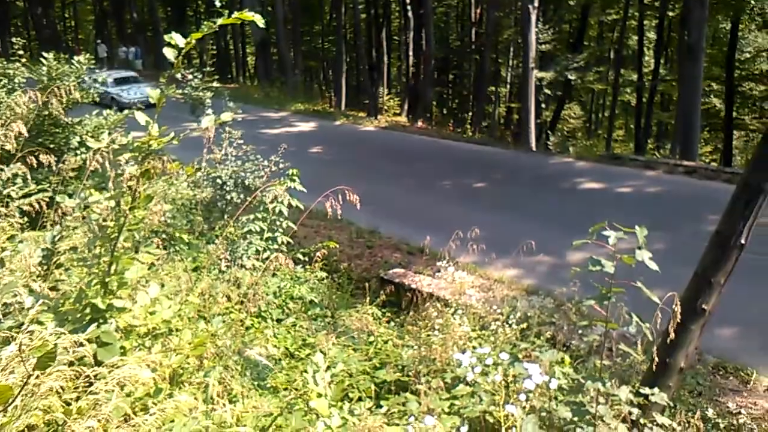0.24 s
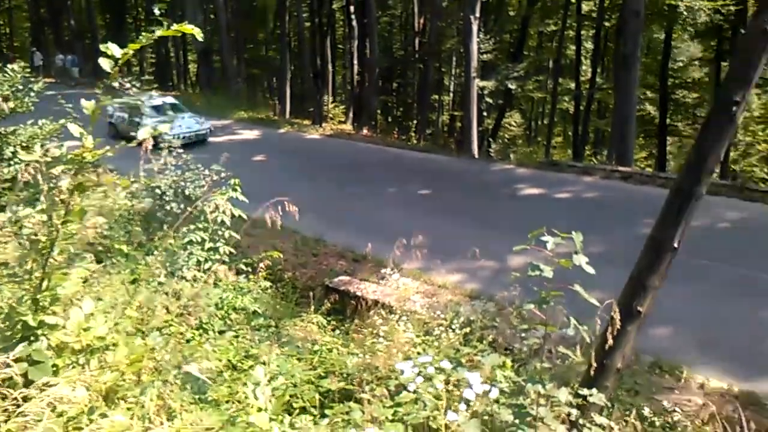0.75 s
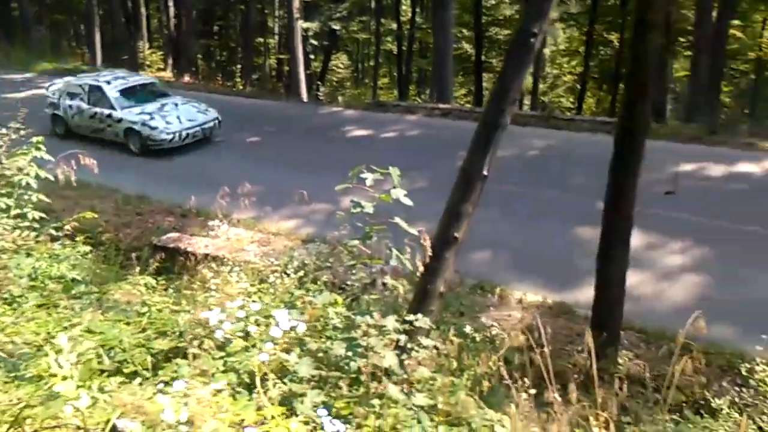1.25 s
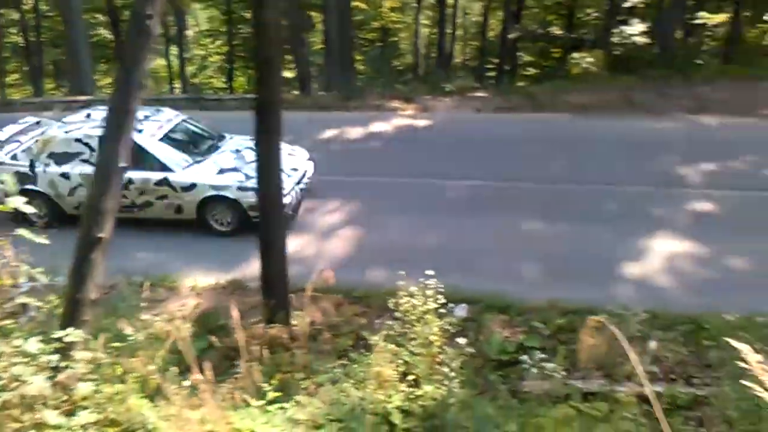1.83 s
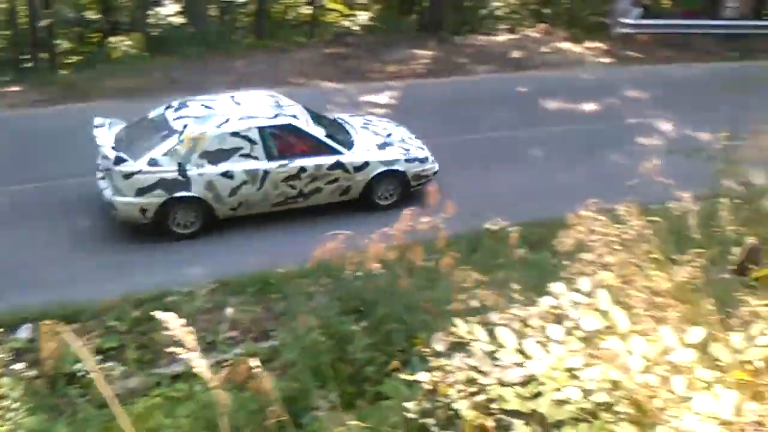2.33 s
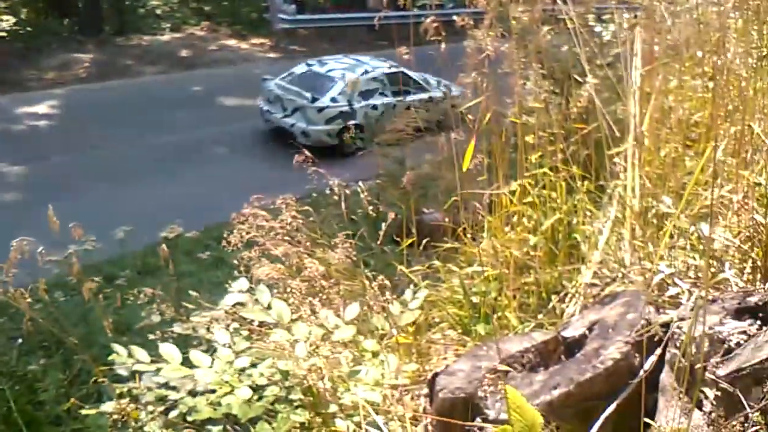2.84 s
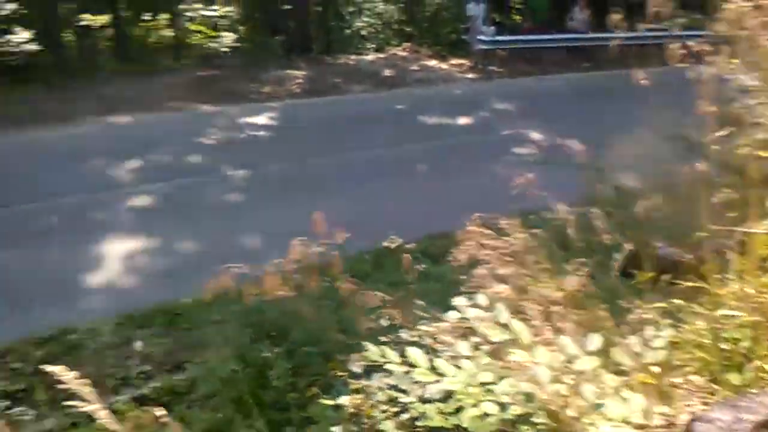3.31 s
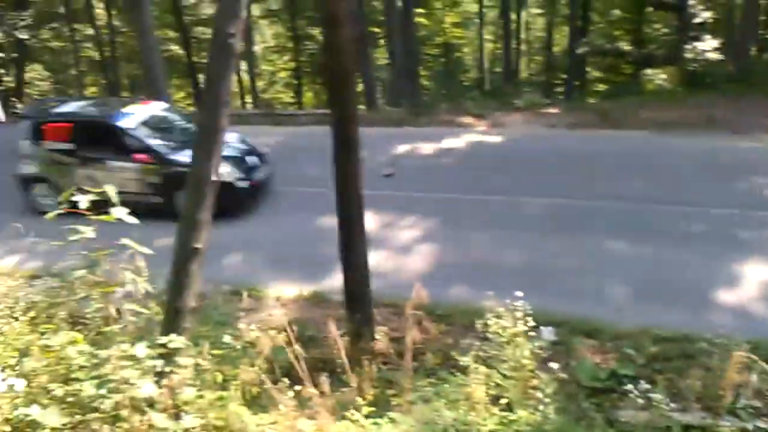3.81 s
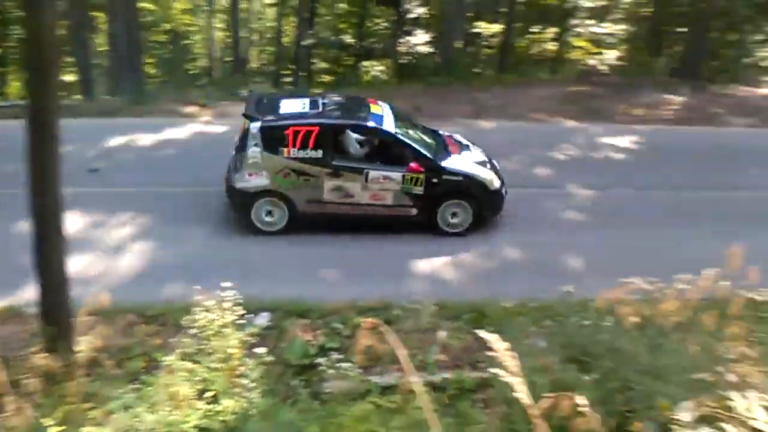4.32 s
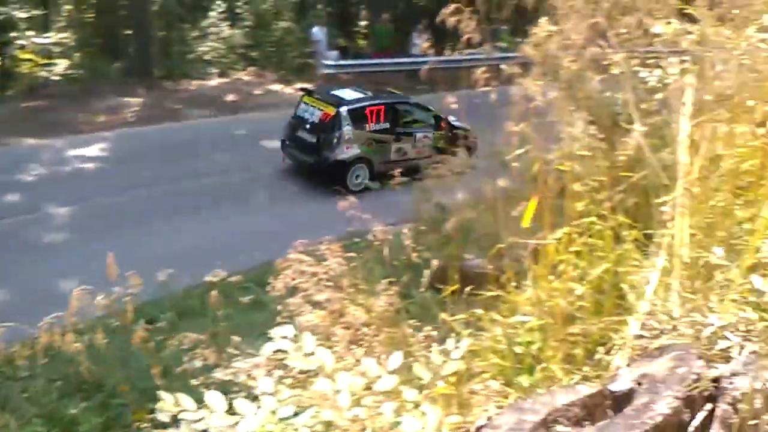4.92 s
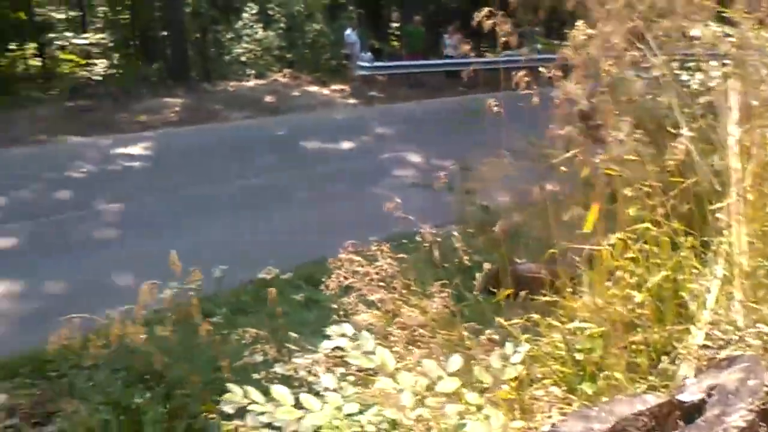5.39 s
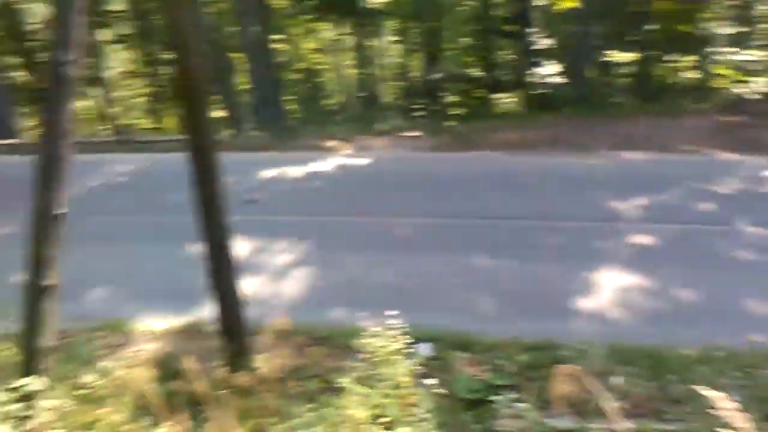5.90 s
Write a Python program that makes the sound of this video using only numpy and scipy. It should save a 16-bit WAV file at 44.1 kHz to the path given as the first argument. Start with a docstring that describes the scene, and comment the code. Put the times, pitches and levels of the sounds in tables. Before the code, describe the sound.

On a wooded bend, a first rally car approaches with a low engine drone that sinks in pitch, gives a brief thin brake squeak, passes in a wash of tyre noise and accelerates away. A second, louder car soon bursts in on steady revs, growls and barks as it passes, then recedes with hissing, scrubbing tyres. Heard outdoors from a roadside bank with a handheld microphone and faint echoes off trees.

```python
"""A spectator on a bank above a forest bend hears two rally cars go by, over an engine far up the road.
The first drones in on sinking revs, squeaks its brakes and pulls away; the second arrives louder,
holds its revs, barks as it passes and scrubs its tyres on the way out. Sine orders make the notes, uneven
firings ring the exhausts, and shaped noise makes tyres, grit and rushes. Ground and trunks add echoes."""
import sys
import numpy as np
from scipy import signal
from scipy.fft import rfft, irfft
from scipy.io import wavfile
from scipy.ndimage import uniform_filter1d, map_coordinates

SR = 44100
rng = np.random.default_rng(int(sys.argv[2]) if len(sys.argv) > 2 else 0)


def to_wav(s):
    """Save 16-bit WAV."""
    ch = np.atleast_2d(s).T  # columns
    pcm = np.round(np.clip(ch, -1, 1) * 32767)  # PCM
    wavfile.write(sys.argv[1], SR, pcm.astype(np.int16))


N = 271215
T = np.arange(N) / SR
HZ = np.fft.rfftfreq(N, 1 / SR)


def amp(db):
    """Decibels to gain."""
    return 10 ** (np.asarray(db) / 20)


def unit(x):
    """Scales to an rms of one."""
    return x / np.sqrt(np.mean(x ** 2) + 1e-20)


def curves(rows):
    """The columns of a table after its times, joined by straight lines."""
    s, *columns = np.transpose(rows)
    return [np.interp(T, s, c) for c in columns]


def during(rows, fade_s=0.049):
    """One while a table lasts, fading to nothing outside it."""
    return np.clip(1 + np.minimum(T - rows[0][0], rows[-1][0] - T) / fade_s, 0, 1)


def rise(s, seconds):
    """A smooth step from nothing to one, centred on s."""
    return .5 + .5 * np.tanh((T - s) / (2 * seconds))


def surges(rows, edge_s=0.032):
    """Decibels added by swells that rise, hold and fall."""
    return sum(db * rise(start, edge_s) * (1 - rise(end, edge_s)) for start, end, db in rows)


def noise():
    """White noise."""
    return rng.standard_normal(N)


def drift(hz):
    """Random wandering, up to about hz times a second, with an rms of one."""
    return unit(irfft(rfft(noise()) * np.exp(-(HZ / hz) ** 2), N))


def colour(x, points):
    """Gives x a spectrum drawn through (Hz, dB) points and rolled off beyond both ends."""
    f, db = np.transpose(points)
    gain = amp(np.interp(np.log(HZ + 1), np.log(f), db))
    top = 1 / (1 + (HZ / (2 * f[-1])) ** 4)
    bottom = 1 / (1 + (f[0] / 2 / (HZ + 1)) ** 4)
    return unit(irfft(rfft(x) * gain * top * bottom, N))


def resonate(x, hz, pole_width_hz, order=2):
    """A moving resonance: shift hz down to zero, smooth, shift back."""
    turn = np.exp(2j * np.pi * np.cumsum(hz) / SR)
    r = np.exp(-np.pi * pole_width_hz / SR)
    z = x / turn
    for _ in range(order):
        z = signal.lfilter([1 - r], [1, -r], z)
    return unit((turn * z).real)


def phase_of(hz, waver, waver_hz):
    """The running phase of a pitch that wavers by a small fraction."""
    return 2 * np.pi * np.cumsum(hz * (1 + waver * drift(waver_hz))) / SR


# the bounce off the ground, its path changing: start_s, share (of the direct sound), delay_s
BOUNCE = [(0, 0.17, 0.00142), (2.1, 0.12, 0.0016), (3.3, 0.042, 0.0012), (3.5, 0.12, 0.001046),
          (3.95, 0.28, 0.001536), (5.25, 0.12, 0.00171), (5.8, 0.052, 0.0018)]


def bank_echo(x):
    """The bounce off the ground combs the sound."""
    share, delay = curves(BOUNCE)
    bounce = map_coordinates(x, [(T - delay) * SR], order=3)
    return (x + share * bounce) / np.sqrt(1 + share ** 2)


def forest(x, t60_s=1.0, wet_db=-12):
    """Trunks scatter a thin, dying tail of sparse echoes."""
    t = T[:SR]
    hits = rng.standard_normal(SR) * (rng.random(SR) < 1500 / SR)  # about 1500 a second
    tail = hits * (t > .015) * amp(-60 * t / t60_s)
    return x + amp(wet_db) * signal.fftconvolve(x, tail / np.linalg.norm(tail))[:N]


def trunk_echoes(x, count=4, share=.1, slide_s=.0012):
    """Near trunks send short echoes with wandering delays, so streaks drift through the roar."""
    delays = [rng.uniform(.003, .008) + slide_s * drift(.8) for _ in range(count)]
    echoes = sum(map_coordinates(x, [(T - delay) * SR], order=3) for delay in delays)
    return (x + share * echoes) / np.sqrt(1 + count * share ** 2)


# the two passes, first car then second: abreast_s, speed_m_per_s, closest_m
CARS = [(2.31, 16.2, 20.8), (4.4, 22, 15)]
SOUND_M_PER_S = 343


def motion(abreast, speed, closest):
    """How near a car is (one when abreast), and its Doppler factor."""
    along = speed * (T - abreast)
    distance = np.hypot(along, closest)
    return closest / distance, 1 / (1 + speed / SOUND_M_PER_S * along / distance)


# the bank uncovers a passing car quickly; it hides the first one as the second arrives
SWING_S, HIDDEN_S, HIDE_S = 0.026, 3.88, .03


def handover(first, second):
    """Follows the first car until the bank hides it, then the second."""
    return first + (second - first) * rise(HIDDEN_S, HIDE_S)


def pass_db(car, s, db, step_db, power, fade_db_per_s):
    """A sound grows as the car nears, steps up as the bank uncovers it, and fades at its own rate."""
    nearing_db = power * 20 * np.log10(motion(*car)[0]) * (T < car[0])
    return db + nearing_db - step_db * (1 - rise(s, SWING_S)) - fade_db_per_s * np.maximum(T - s, 0)


def both_cars(rows):
    """Gain of one layer for both passes, the first car vanishing when hidden."""
    first, second = (amp(pass_db(car, *row)) for car, row in zip(CARS, rows))
    return np.hypot(first * (1 - rise(HIDDEN_S, HIDE_S)), second)


# swells of throttle: start_s, end_s, swell_db (full on the boom; rasp and clatter take a share)
THROTTLE = [(2.55, 2.72, 5.5), (3.45, 3.85, 1.5), (4.39, 4.56, 4), (4.79, 5.06, 8.5)]


def throttle_db():
    """Bursts of throttle as a swell in decibels."""
    return surges(THROTTLE)


# sine orders of an engine: multiple (of the note's pitch), level_db (relative)
NOTE_ORDERS = [(1, 0), (1.5, -31), (2, -28.5), (2.5, -31.5), (3, -32)]


def exhaust_note(hz, gain, waver=0.0037, flutter_db=2.0):
    """The clean low orders of an engine; unequal cylinders give the half orders."""
    phase = phase_of(hz, waver, 25)
    orders = sum(amp(db) * np.sin(k * phase + 2 * np.pi * rng.random()) for k, db in NOTE_ORDERS)
    return np.sqrt(2) * orders * gain * amp(flutter_db * drift(33))


def gliding_note(rows):
    """An engine note that follows a table of pitch and level."""
    hz, db = curves(rows)
    return exhaust_note(hz, amp(db) * during(rows))


# an engine far up the road: start_s, pitch_hz, level_db
FAR_ENGINE = [(0, 356, -75), (.3, 359.6, -67.5), (1.1, 350, -71)]


def far_engine():
    """A faint distant note of sine orders."""
    return gliding_note(FAR_ENGINE)


# thin spits: start_s, level_db (before trim), centre_hz
TICKS = [(3.806, -57, 13300), (4.066, -66, 11700), (5.852, -61, 12020)]


def ticks(decay_s=0.0035, trim_db=-6):
    """Short, thin spits of high noise close by."""
    out = np.zeros(N)
    for s, db, hz in TICKS:
        age = np.maximum(T - s, 0) / decay_s
        spit = resonate(noise(), np.full(N, hz), 1300)
        out += amp(db + trim_db) * spit * age * np.exp(1 - age)
    return out


def rush_band(rows, chatter_db=1.5):
    """Chattering noise in a gliding resonance, as wide as the table's mean width suggests."""
    hz, width, db = curves(rows)
    band = resonate(noise(), hz, 2 * np.mean(width), order=4)
    return band * amp(db + chatter_db * drift(120)) * during(rows)


# hiss of each car's brakes: start_s, centre_hz, width_hz (nominal), level_db
BRAKE_HISS = [(1.7, 5060, 698.5, -96), (1.95, 5104, 695.6, -84), (2.3, 4950, 710, -96)]
SECOND_BRAKE_HISS = [(3.7, 5760, 800, -80), (4.25, 5300, 800, -88), (4.5, 5100, 800, -77),
                     (5.15, 5030, 800, -71)]


def brake_hiss():
    """Braking breathes a high band of noise, once for each car."""
    return rush_band(BRAKE_HISS) + rush_band(SECOND_BRAKE_HISS)


# brake squeak: start_s, pitch_hz, level_db
SQUEAK = [(1.93, 2330, -68), (2.03, 2310, -66), (2.12, 2240, -61), (2.19, 2150, -74), (2.25, 2132, -76)]


def squeak():
    """A brake disc sings briefly as one wavering sine that sinks in pitch."""
    hz, db = curves(SQUEAK)
    tone = np.sqrt(2) * np.sin(phase_of(hz, 0.003, 70))
    return tone * amp(db + 2.0 * drift(60)) * during(SQUEAK)


# falling swish: start_s, centre_hz, width_hz (nominal), level_db
SWISH = [(3.36, 1810, 170, -57), (3.52, 1450, 168.5, -51), (3.66, 1210, 170, -56), (3.85, 1000, 173, -59)]


def swish():
    """A narrow band of noise sweeps downwards."""
    return rush_band(SWISH)


# tread hum, then the second car's as it leaves: start_s, centre_hz, width_hz (nominal), level_db
TREAD_HUM = [(3.6, 746, 80, -63), (3.8, 740, 80, -49), (3.949, 826, 80, -57), (4.3, 776, 80, -59)]
LEAVING_HUM = [(5.05, 680, 160.3, -48), (5.28, 704, 160, -43.5), (5.55, 658, 160, -48.5),
               (6.15, 685, 160, -46)]


def tread_hum():
    """Tread blocks hum as a low narrow band of noise."""
    return rush_band(TREAD_HUM) + rush_band(LEAVING_HUM)


# breathy whine: start_s, centre_hz, width_hz (nominal), level_db
WHINE = [(3.85, 2510, 243, -61), (4.1, 2570, 235, -61.5), (4.45, 2530, 240, -55), (4.75, 2455, 239, -59)]


def whine():
    """A narrow, high band of noise whines."""
    return rush_band(WHINE)


# throaty growl: start_s, centre_hz, width_hz (nominal), level_db
THROAT = [(4.15, 362, 108.8, -58), (4.42, 380, 109, -41), (4.6, 388, 112.6, -38), (4.85, 361.4, 109, -53)]


def throat():
    """The second car growls in a low resonance as it passes."""
    return rush_band(THROAT)


# intake rush: start_s, centre_hz, width_hz (nominal), level_db
INTAKE = [(4.301, 1360, 310, -52), (4.5, 1250, 300, -45), (4.8, 1250, 300, -38.5), (5.05, 1150, 308, -43),
          (5.2, 1220, 300, -63)]


def intake():
    """Air drawn into the engine rushes in a broad resonance."""
    return rush_band(INTAKE)


# tyre scrub: start_s, centre_hz, width_hz (nominal), level_db
SCRUB = [(5.1, 2670, 715.7, -59), (5.5, 2540, 720, -40.5), (5.749, 2450, 726, -33.5),
         (5.9, 2620, 720, -29.5), (6.0, 2410, 720, -30.5), (6.12, 2150, 720, -31)]


def scrub():
    """Tyres slip on the way out, a wide band of noise."""
    return rush_band(SCRUB)


# leaves swallow the top of the roar as a car gets farther away
LEAVES_HZ, LEAVES_POWER, NEAR_TREBLE_DB = 4300, 0.65, 3


def through_leaves(x):
    """Far away, the foliage dulls the treble."""
    near = handover(*[motion(*car)[0] for car in CARS])
    low = irfft(rfft(x) / (1 + (HZ / LEAVES_HZ) ** 10), N)
    return low + (x - low) * amp(NEAR_TREBLE_DB) * near ** LEAVES_POWER


# tyres leaning into the bend: start_s, end_s, swell_db (full on the roar, half on the grit)
CORNERING = [(3.55, 3.9, 4.5), (4.74, 6.4, 5.5)]


def lean_db():
    """Tyres load up in the bend and get louder."""
    return surges(CORNERING)


# grit spectrum: centre_hz, level_db (relative)
HISS = [(2000, -9), (4500, 8.5), (7000, 0.5), (10000, -0.5), (13500, 1)]
# grit per car: uncovered_s, level_db, step_db, approach_power (of nearness), fade_db_per_s
GRIT = [(2.3, -75, 6.1, .1, 2.5), (4.4, -68, 5.2, 1.8, 4.6)]
# sprays thrown up by the wheels: start_s, end_s, swell_db
SPRAYS = [(2.7, 2.8, 5.5), (4.75, 5.23, 1)]


def grit():
    """Fine grit fizzes: high noise with a very fast flicker."""
    fizz = colour(noise() * amp(1.3 * drift(500)), HISS)
    return fizz * both_cars(GRIT) * amp(0.5 * lean_db() + surges(SPRAYS))


# turn of each car from nose to tail: turning_s, side_before (scaled by nearness squared), side_after
# (side: 0 ahead, 1 abreast, 2 behind)
TURNS = [(0.053, 0.327, 1.1), (0.149, 0.796, 1.9)]


def aspect_heard():
    """A nearing car shows more of its flank, then swings round as it passes."""
    sides = []
    for car, (seconds, before, after) in zip(CARS, TURNS):
        flank = before * motion(*car)[0] ** 2
        sides.append(flank + (after - flank) * rise(car[0], seconds))
    return np.clip(handover(*sides), 0, 2)


# tyre spectra from three sides: centre_hz, level_db (relative)
AHEAD = [(400, -11), (600, -4), (780, 4), (1030, -8), (1470, 4.5), (1720, -1.5), (1980, 2), (2230, 0.5),
         (2650, 0.5), (3000, -9), (3700, -25.5), (4600, -34.5), (6500, -42)]
ABREAST = [(400, -20), (750, -2), (1050, 3.5), (1600, 1), (2400, -0.5), (2800, -5), (3200, -10.5),
           (3750, -16), (4400, -30.5), (5400, -34), (6500, -44), (9000, -62)]
BEHIND = [(400, -15), (900, -3), (1200, -1), (1600, 1), (2100, 1), (2750, 3), (3200, -4), (3900, -10.5),
          (4700, -25.5), (6000, -29.5), (7200, -40.5), (9000, -59)]
# tyre and air roar per car: uncovered_s, level_db (before trim), step_db, approach_power, fade_db_per_s
ROAR = [(2.31, -49.5, 6.2, 1.04, 1.825), (4.41, -43, 10.6, 1.5, -0.65)]


def tyre_roar(throb, trim_db=1.0, behind_db=1.5, throb_share=0.38, throttle_share=0.19):
    """Tread noise pulsing with engine clatter, its spectrum blended by the side that faces us."""
    aspect = aspect_heard()
    rush = noise() * (1 - throb_share + throb_share * throb) * amp(.5 * drift(38))
    roar = sum(np.maximum(1 - abs(aspect - k), 0) * colour(rush, side)
               for k, side in enumerate([AHEAD, ABREAST, BEHIND]))
    swell_db = lean_db() + throttle_share * throttle_db() + behind_db * aspect / 2
    return through_leaves(roar) * both_cars(ROAR) * amp(trim_db + swell_db)


# first car approaching on sinking revs: start_s, firing_hz, level_db
DRONE = [(0.0, 78.1, -45), (0.076, 75.4, -42.5), (0.28, 70.6, -34), (0.376, 68.3, -42.5),
         (0.648, 65.84, -38.5), (0.774, 59.9, -31), (0.904, 54.34, -34.5), (1.058, 46.3, -39.5),
         (1.2, 39.6, -57)]


def drone():
    """The first car's note sinks with its revs."""
    return gliding_note(DRONE)


# first car leaving: start_s, pitch_hz (twice the firing rate), level_db
PULL_AWAY = [(2.241, 141.3, -45.5), (2.509, 148.9, -42.5), (2.86, 156.1, -39), (3.05, 159, -41),
             (3.28, 163, -44.5), (3.58, 150.2, -45.5)]


def pull_away():
    """The first car accelerates off, sounding twice its firing rate."""
    return gliding_note(PULL_AWAY)


# notes off the throttle: start_s, length_s, first_hz, last_hz, peak_db
OVERRUNS = [(1.142, 0.21, 77.5, 59.4, -41), (5.028, 0.431, 86, 54.5, -28.5)]


def overruns():
    """Short engine notes fall in pitch as the throttle shuts."""
    out = np.zeros(N)
    for start, length, first_hz, last_hz, db in OVERRUNS:
        done = np.clip((T - start) / length, 0, 1)
        out += exhaust_note(first_hz + (last_hz - first_hz) * done, amp(db) * np.sin(np.pi * done))
    return out


def second_rate():
    """Firings per second of the second car: steady revs bent by Doppler shift."""
    return 105.57 * motion(*CARS[1])[1]


# note of the second car: uncovered_s, level_db (abreast), step_db, nearness_power
SECOND_NOTE = [(4.19, -29, 9, 2.04)]


def held_note():
    """The second car's note swells and sinks with its nearness."""
    s, db, step_db, power = SECOND_NOTE[0]
    gain = amp(db - step_db * (1 - rise(s, SWING_S))) * motion(*CARS[1])[0] ** power
    return exhaust_note(second_rate(), gain, waver=0.0062, flutter_db=2.5)


# higher orders of the open exhaust: multiple (of the firing rate), level_db (relative)
BARK_ORDERS = [(1.5, -0.5), (2.5, 0.5), (3, -10), (3.5, -18), (4.5, -17.5), (5, -12), (5.5, -8.5),
               (6.5, -12), (7.5, -9.5), (8, -9)]
# loudness of the bark: start_s, level_db
BARK = [(4.1, -57), (4.42, -44), (5.2, -38), (6.15, -50.5)]


def bark(flutter_db=4.0):
    """Higher orders of the second engine, each fading in and out among the trees."""
    phase = phase_of(second_rate(), 0.00757, 12.22)
    orders = sum(amp(db + flutter_db * drift(28)) * np.sin(k * phase + 2 * np.pi * rng.random())
                 for k, db in BARK_ORDERS)
    return orders * amp(curves(BARK)[0]) * during(BARK)


def firing_rate():
    """Firings per second of the first car, then of the second."""
    droning = during(DRONE)
    first = droning * curves(DRONE)[0] + (1 - droning) * curves(PULL_AWAY)[0] / 2
    return handover(first, second_rate())


# strength_db of each firing in the engine cycle
CYLINDERS = [-7.5, -8, -7.5, -9.5]


def firings(puff_length=0.39, gas_share=0.61, pulse_share=0.3):
    """Each firing is an uneven pressure pulse and a puff of gas; returns the drive and its throb."""
    turns = np.cumsum(firing_rate()) / SR
    count = turns.astype(int)
    strength = amp(np.take(CYLINDERS, count, mode="wrap"))
    pulses = np.diff(count, prepend=0) * strength * (1 + .5 * noise())
    throb = unit(.5 + strength * np.exp(-(turns % 1) / puff_length))
    return pulse_share * unit(pulses) + gas_share * throb * noise(), throb


# tailpipe mouth spectrum: centre_hz, level_db (relative)
RASP = [(120, -32), (250, -1.5), (330, 8.5), (400, 2), (470, 4), (560, 1), (680, 0.5), (790, -4),
        (900, -8.5), (1400, -14.5), (3000, -53)]
# rasp per car: uncovered_s, level_db (before trim), step_db, approach_power, fade_db_per_s
TAILPIPE = [(2.28, -46.5, 10.3, 1.6, .4), (4.39, -39.8, 7.4, 1.7, 3.1)]


def tailpipe_rasp(drive, trim_db=2.0, throttle_share=0.45):
    """The firings rasp at the tailpipe mouth, a little harder on the throttle."""
    return colour(drive, RASP) * both_cars(TAILPIPE) * amp(trim_db + throttle_share * throttle_db())


# silencer boom per car: uncovered_s, level_db (before trim), step_db, approach_power, fade_db_per_s
BOOM = [(2.26, -45, 12, 0.12, -2), (4.18, -35.5, 4.8, 1.8, 3.5)]
# the boom sits higher the nearer the car is; near pitch of the first and the second car
BOOM_FAR_HZ, BOOM_NEAR_HZ = 149.5, (236.7, 273.5)


def silencer_boom(drive, trim_db=-1.5):
    """The firings ring the silencer's resonance."""
    hz = handover(*[BOOM_FAR_HZ + (near_hz - BOOM_FAR_HZ) * motion(*car)[0]
                    for car, near_hz in zip(CARS, BOOM_NEAR_HZ)])
    return resonate(drive, hz, 170, order=3) * both_cars(BOOM) * amp(trim_db + throttle_db())


# long exhaust pipe of each car: centre_hz, level_db (relative)
PIPE = [(35, -32), (48, 0), (60, 2.5), (82, 2), (105, -7), (130, -6), (170, -6.5), (230, -45), (400, -51)]
SECOND_PIPE = [(35, -42), (48, 4.5), (62, 3.5), (95, 3.5), (115, -10.5), (135, -12.5), (170, -9.5),
               (220, -18), (300, -37)]
# burble per car: uncovered_s, level_db (before evening out), step_db, approach_power, fade_db_per_s
BURBLE = [(2.24, -42, 4, 0.79, 1), (4.19, -28, 10, 3.9, 6)]
# single low chuffs: centre_s, peak_db (before evening out)
CHUFFS = [(2.31, -36.5), (2.51, -34), (2.87, -36.5), (3.39, -35), (4.059, -33)]


def pipe_burble(drive, evenness=0.078, chuff_s=0.064):
    """Gas rumbles in the long pipe, swelling in single chuffs."""
    gas = drive + noise()
    burble = handover(colour(gas, PIPE), colour(gas, SECOND_PIPE))
    burble /= (uniform_filter1d(burble ** 2, size=4000) + 0.046) ** evenness  # mean gas flow evens the beats
    chuffs = sum(amp(db) * np.exp(-((T - s) / chuff_s) ** 2) for s, db in CHUFFS)
    return burble * np.hypot(both_cars(BURBLE), chuffs)


def scene():
    """Both cars, heard over the bank and through the trees."""
    drive, throb = firings()
    rushes = brake_hiss() + swish() + tread_hum() + whine() + throat() + intake() + scrub()
    road = trunk_echoes(tyre_roar(throb) + grit() + rushes)
    exhausts = pipe_burble(drive) + silencer_boom(drive) + tailpipe_rasp(drive) + bark()
    notes = far_engine() + drone() + pull_away() + overruns() + held_note()
    echoed = forest(bank_echo(exhausts + road) + squeak())
    return (echoed + notes + ticks())[None]


def record(dry):
    """The microphone loses the deepest bass; then the treble stops at a band limit."""
    thin = signal.sosfilt(signal.butter(4, 33, "high", fs=SR, output="sos"), dry)
    band_limit = signal.firwin(511, 14300, window=("kaiser", 9), fs=SR)
    return signal.oaconvolve(thin, band_limit[None], "same")


dry = scene()
out = record(dry)
to_wav(out)
```